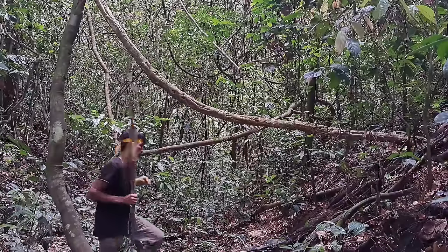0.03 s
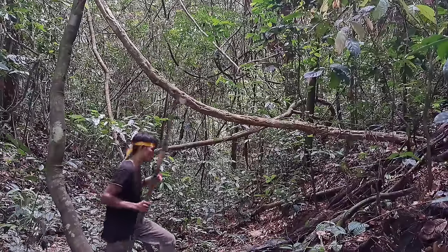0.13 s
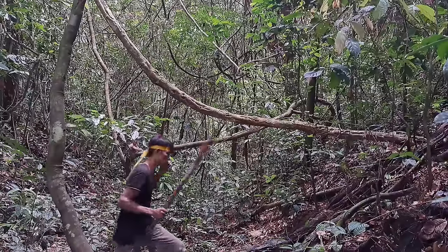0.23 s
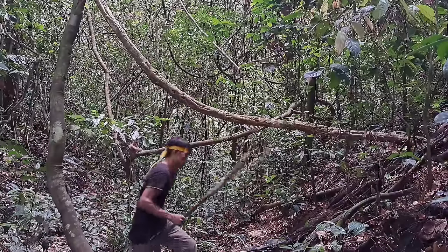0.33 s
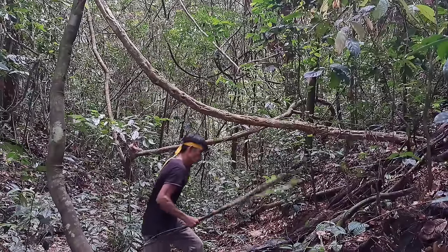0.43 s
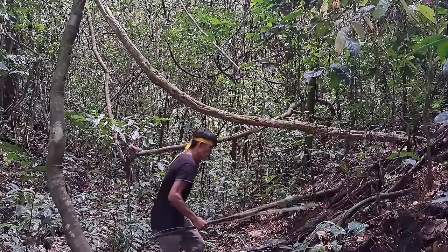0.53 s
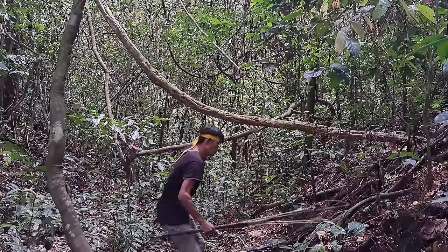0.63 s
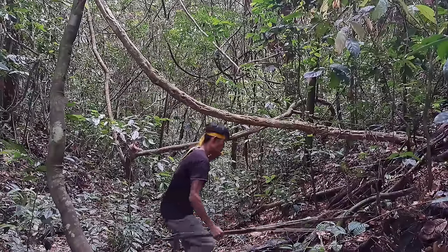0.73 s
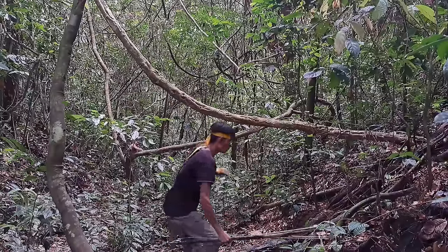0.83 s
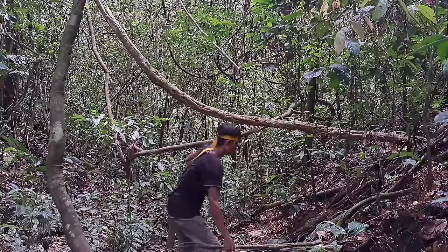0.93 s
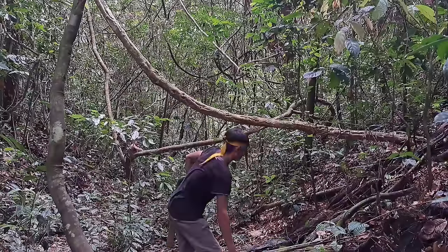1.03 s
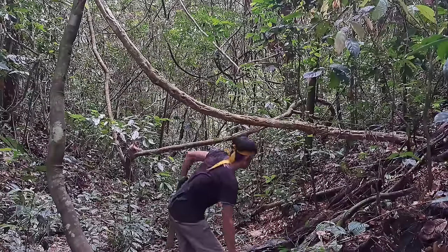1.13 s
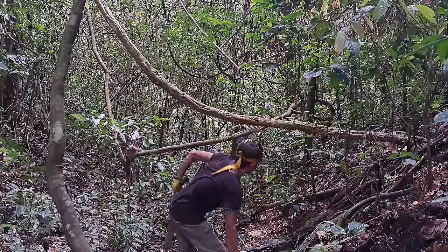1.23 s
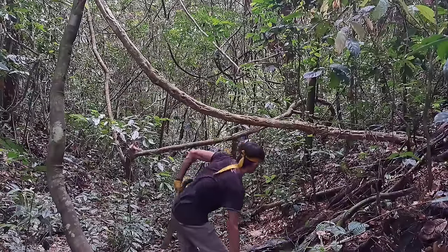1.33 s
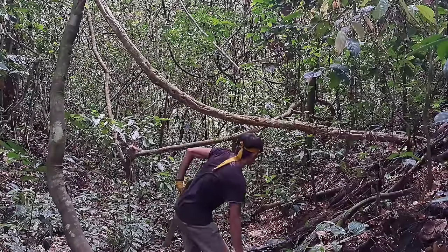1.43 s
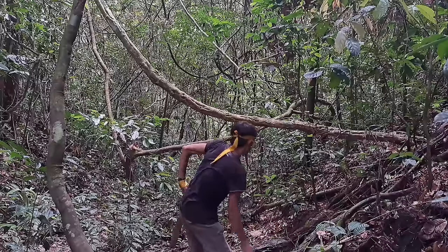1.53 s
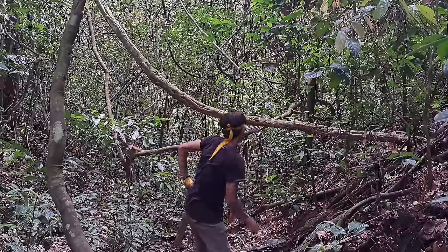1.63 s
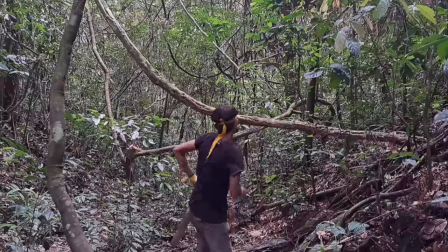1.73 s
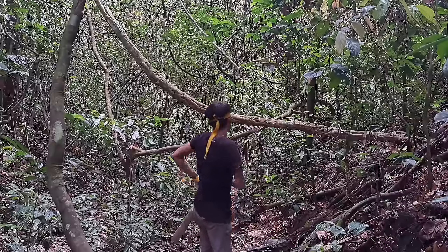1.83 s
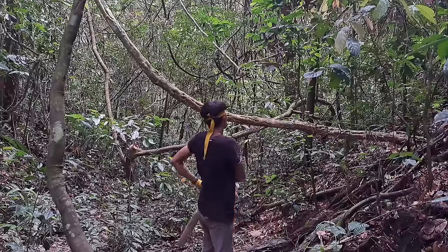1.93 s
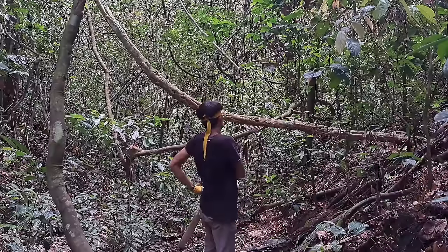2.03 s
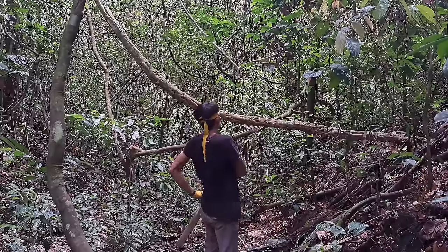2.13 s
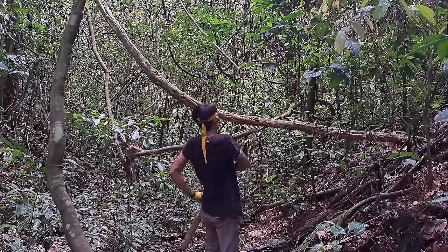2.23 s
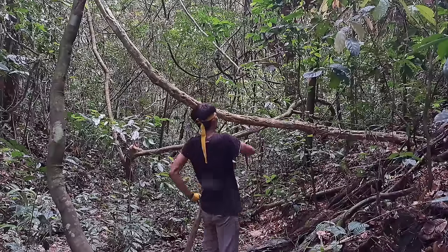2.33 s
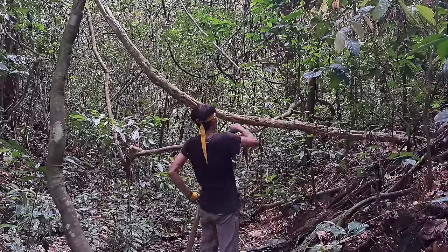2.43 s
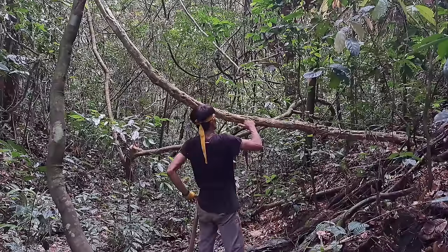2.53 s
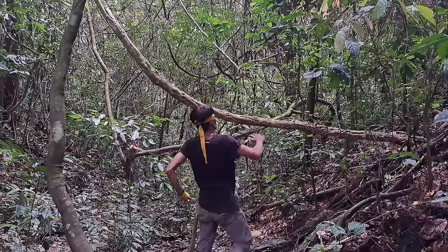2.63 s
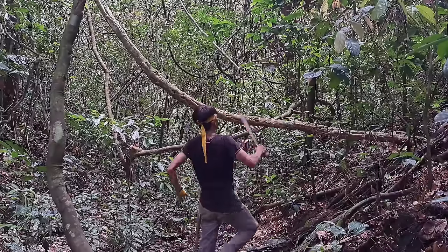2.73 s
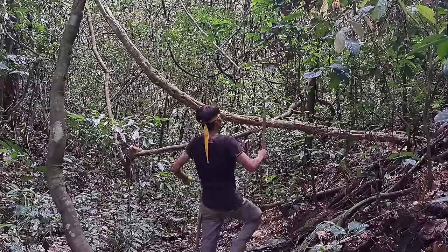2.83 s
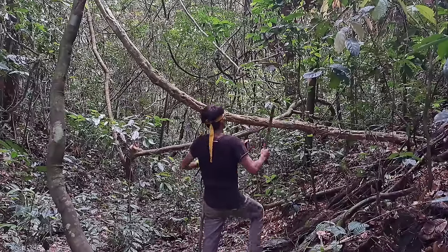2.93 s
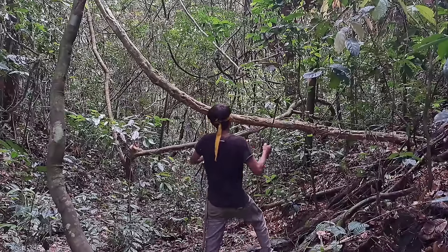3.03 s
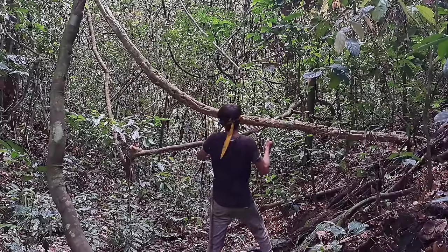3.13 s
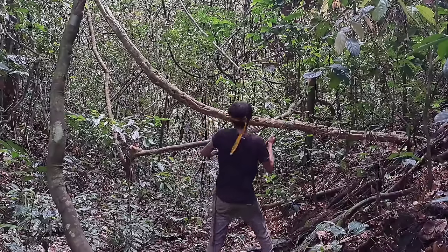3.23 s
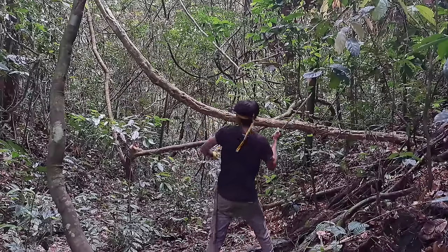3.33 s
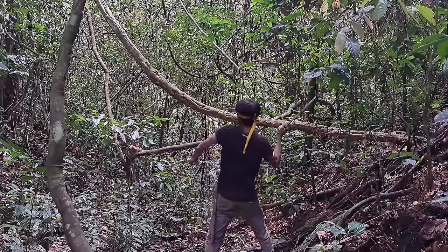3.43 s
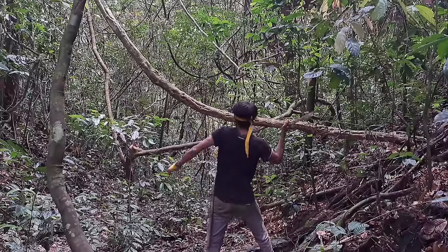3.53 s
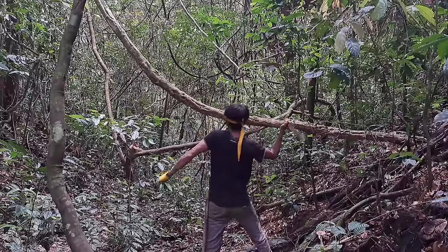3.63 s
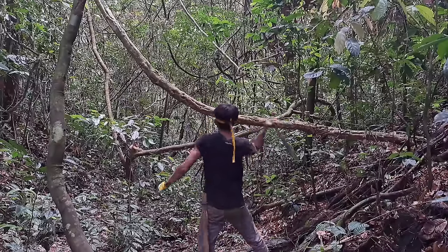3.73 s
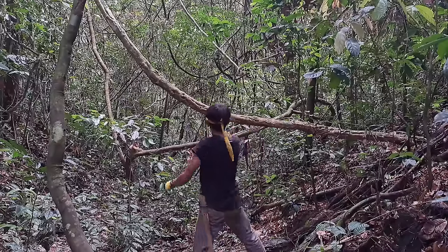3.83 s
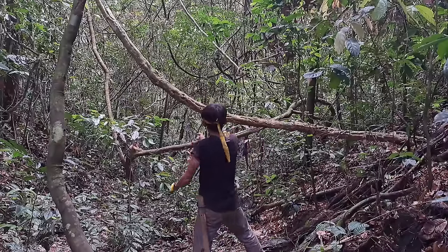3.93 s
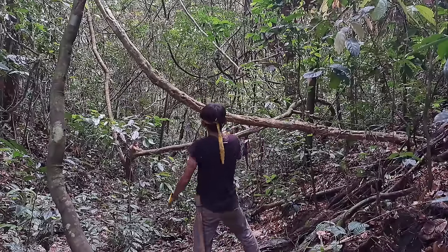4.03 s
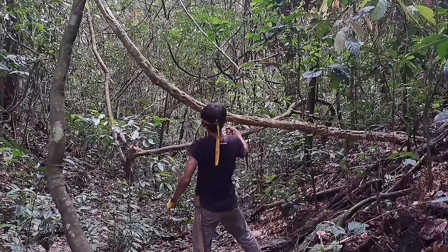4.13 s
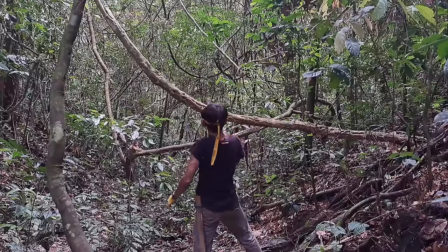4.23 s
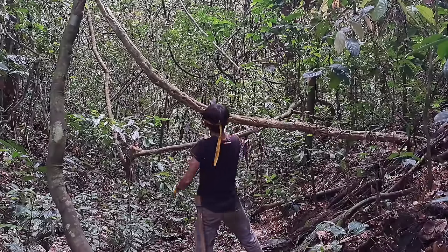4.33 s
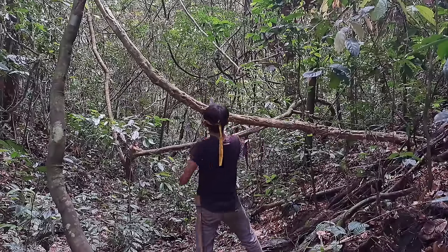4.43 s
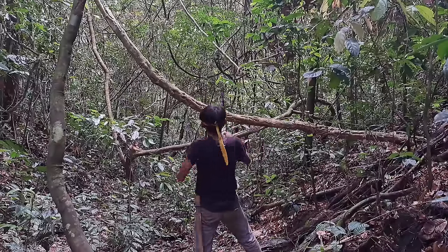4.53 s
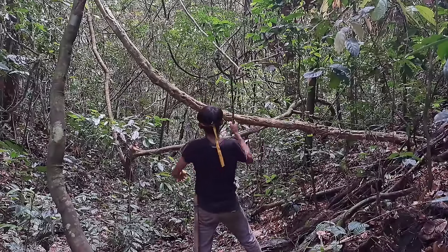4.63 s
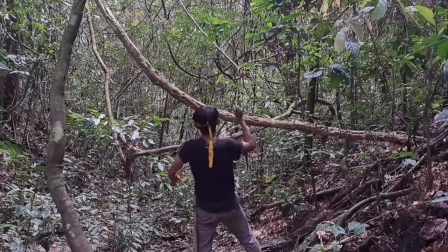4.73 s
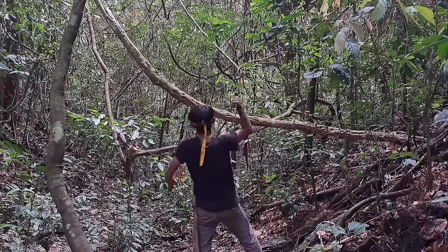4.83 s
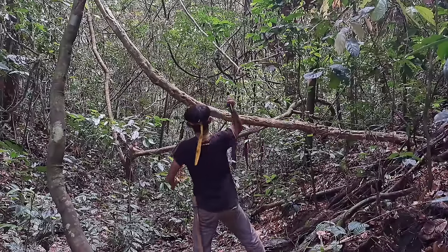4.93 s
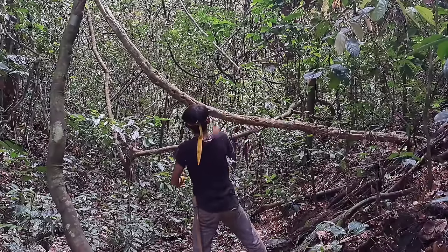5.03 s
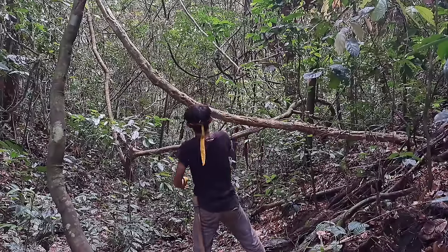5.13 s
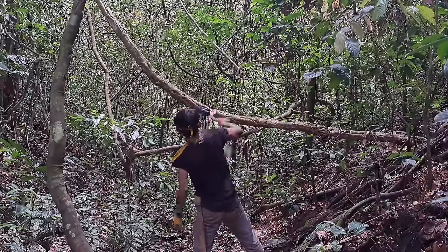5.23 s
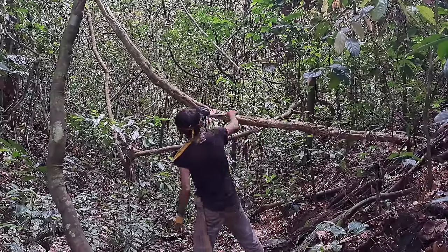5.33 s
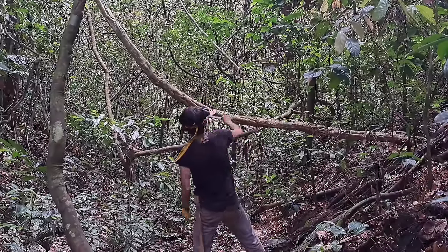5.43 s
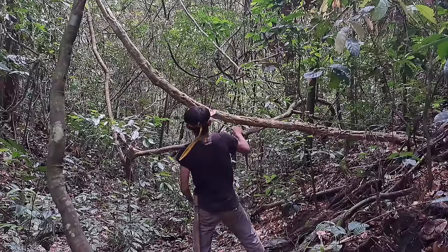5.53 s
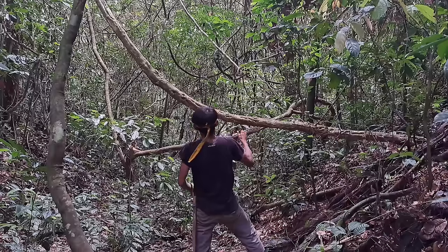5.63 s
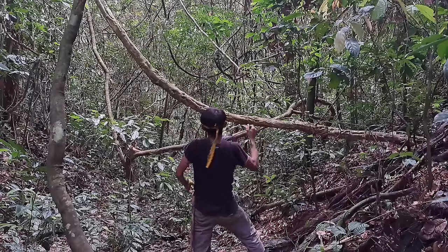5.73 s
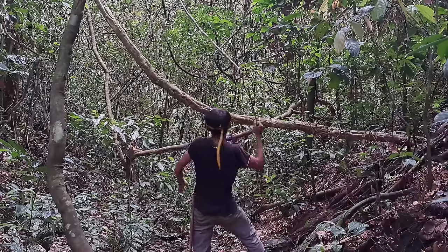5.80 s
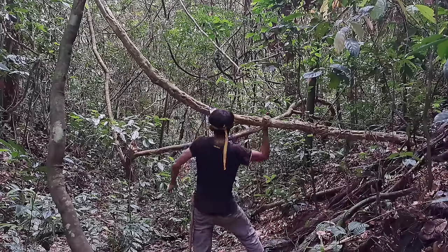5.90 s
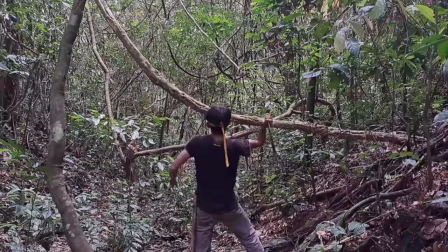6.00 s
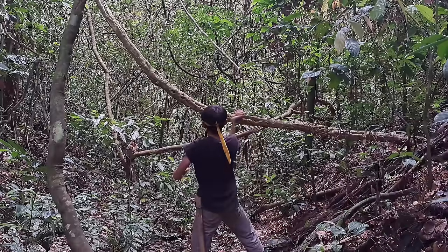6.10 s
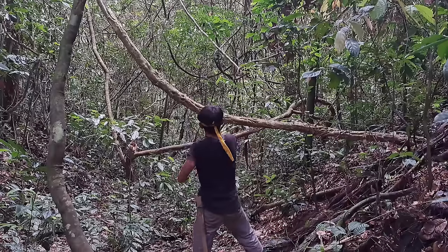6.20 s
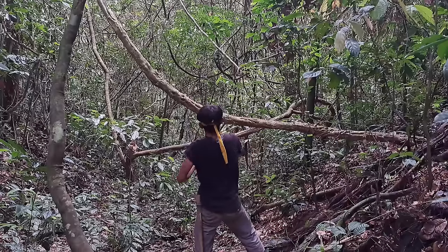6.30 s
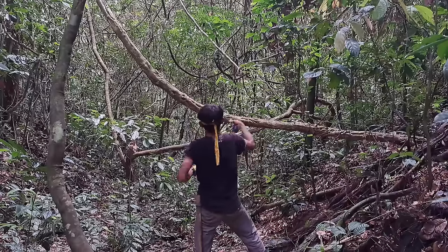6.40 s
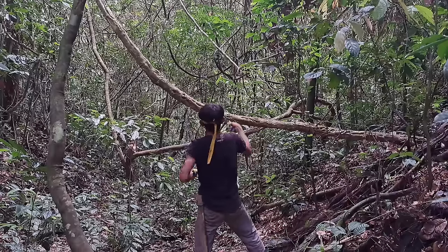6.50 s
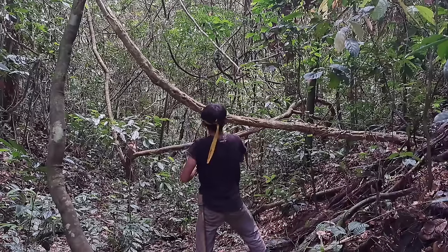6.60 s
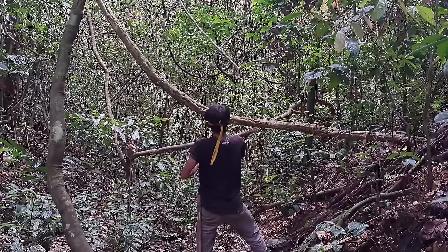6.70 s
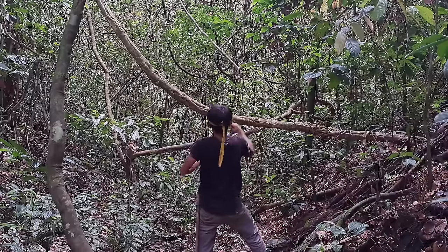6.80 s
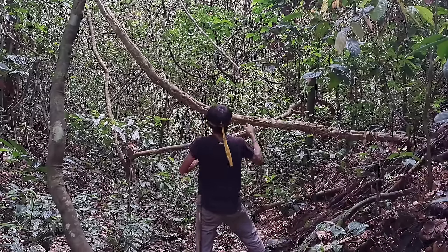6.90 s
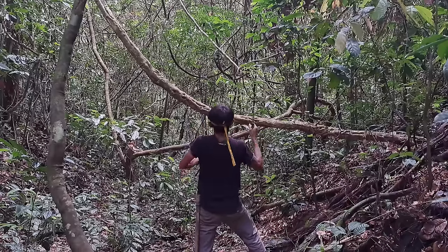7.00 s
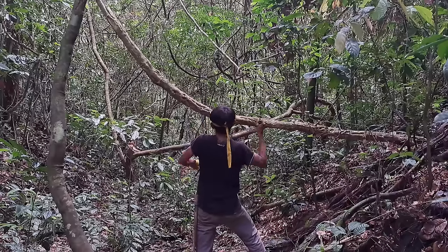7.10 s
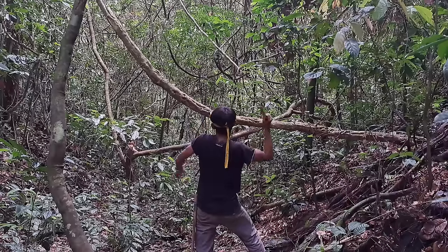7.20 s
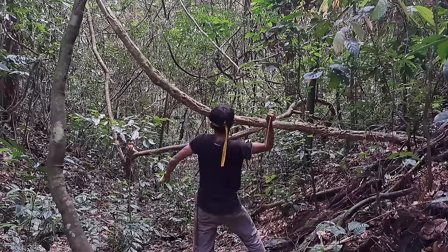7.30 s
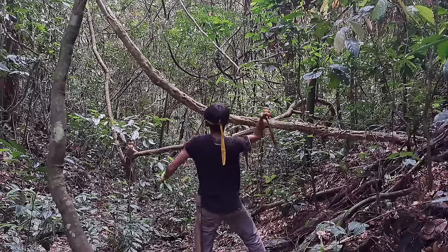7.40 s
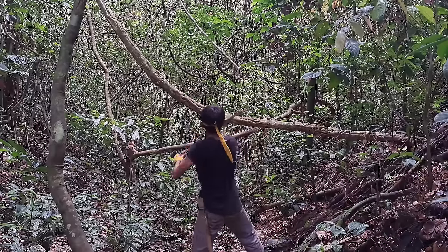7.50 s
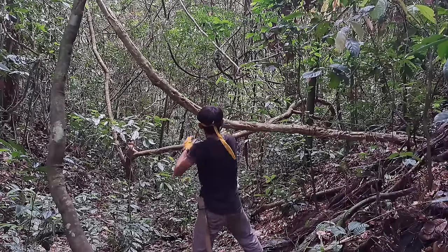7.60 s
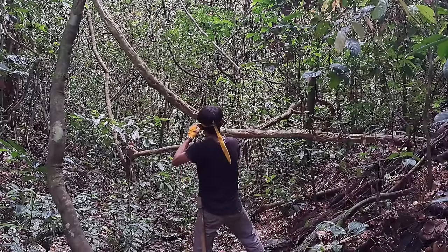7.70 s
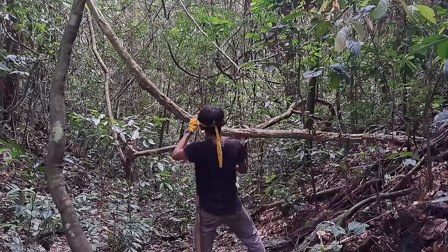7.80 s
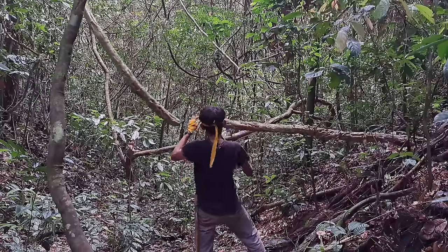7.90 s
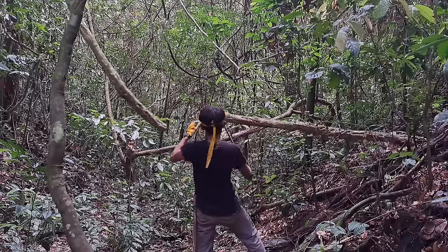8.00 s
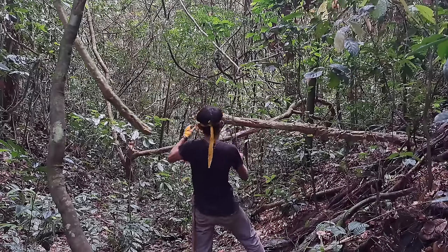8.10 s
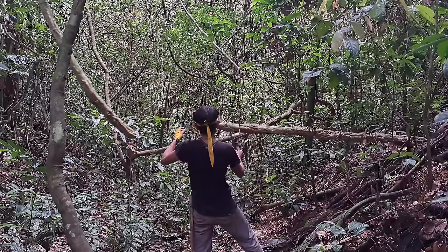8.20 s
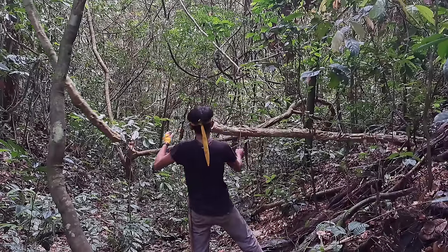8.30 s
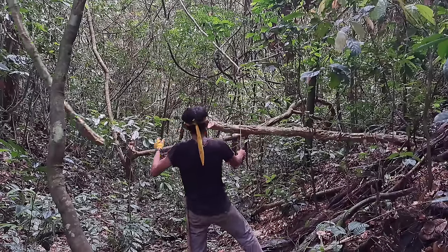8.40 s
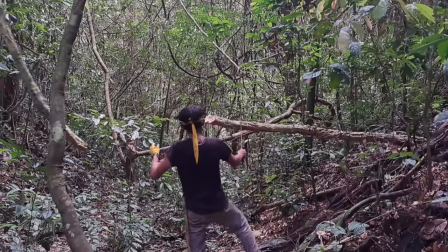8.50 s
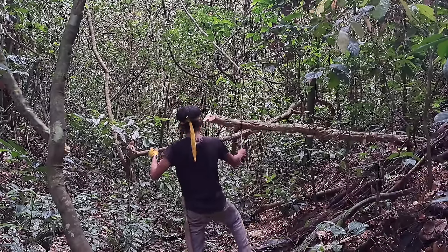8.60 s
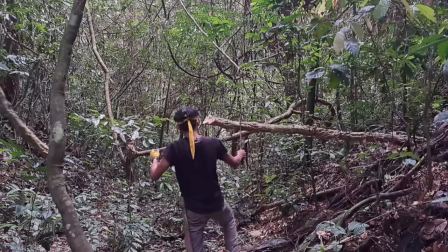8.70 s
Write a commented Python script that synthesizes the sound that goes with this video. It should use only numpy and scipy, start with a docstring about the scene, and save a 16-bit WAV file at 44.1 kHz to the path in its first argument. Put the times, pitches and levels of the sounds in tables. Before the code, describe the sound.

A bright, steady cicada buzz and pulsing cricket tones fill a forest throughout, over very faint air. A distant bird warbles until about 1.3 s; a low soft hoot comes at 1.8 and a tiny peep at 3.9. Soft thuds at 0.3 and 1.0 s, with leaf rustle and twig snaps until 1.7, suggest steps. From 2.25 to 2.55 s a knife scrapes unevenly from a hollow wooden sheath with small knocks, followed by faint shuffles. Heavy chops crack a dry branch at 4.0, 5.15, 6.25 and 7.65 s, slightly right: sharp attack, short low wooden thump, faint blade ring, clearest on the first, and a half-second wash from the trees. The third is fullest. At 5.4 s the blade judders free in a rapid clicking creak. Light snaps fall at 6.15 and 6.7. Around 8.15-8.75 s twigs snap, leaves rustle and a soft thud lands at 8.5.

```python
"""A heavy knife chops a dead branch four times, to the right of the microphones in a forest: noise bursts
crack, decaying sines bend the branch and ring the blade, and fading noise washes back from the trees.
Before that come soft steps in dry leaves (clicks and hiss) and the knife drawn from its wooden sheath
(uneven noise through resonances, with more clicks and hiss). After the second blow the blade judders out.
Cicadas drone in click harmonics and noise, three crickets trill pure tones, and birds call in gliding tones."""
import sys
import numpy as np
from scipy import signal
from scipy.fft import rfft, irfft, next_fast_len
from scipy.io import wavfile
from scipy.ndimage import map_coordinates

SR = 44100
rng = np.random.default_rng(int(sys.argv[2]) if len(sys.argv) > 2 else 0)


def unload_audio(sound):
    """Save the sound as a 16-bit wav file, at the path given as the first command line argument."""
    columns = np.transpose(np.atleast_2d(sound))
    # keep every value between -1 and 1, then stretch to whole-number steps
    steps = np.round(np.clip(columns, -1, 1) * 32767)
    wavfile.write(sys.argv[1], SR, steps.astype(np.int16))


N = 385875

# In every table left_right_db is positive when the left microphone is louder.


def amp(db):
    """Decibels to amplitude."""
    return 10 ** (np.asarray(db) / 20)


def unit(x):
    """Scale x to an rms of 1."""
    return x / np.sqrt(np.mean(x ** 2) + 1e-20)


def along(points, hz):
    """Read a curve of (Hz, value) points on a log frequency axis."""
    f, v = np.transpose(points)
    return np.interp(np.log(hz + 1), np.log(f + 1), v)


def curves(rows, outside=None):
    """One value per sample for each column after the time."""
    s, *cols = np.transpose(rows)
    return [np.interp(np.arange(N) / SR, s, c, outside, outside) for c in cols]


def wobble(rate):
    """A smooth random curve, rate knots a second."""
    knots = rng.standard_normal(int(N * rate / SR) + 4)
    return map_coordinates(knots, [np.arange(N) * rate / SR])


def filtered(x, response):
    """Multiply the spectrum of x by a complex response of frequency."""
    m = next_fast_len(x.shape[-1] + 8192)
    return irfft(rfft(x, m) * response(np.fft.rfftfreq(m, 1 / SR)), m)[..., :x.shape[-1]]


def rush(n, spectrum, alike):
    """Stereo coloured noise of rms 1; the mid and side shares set the left-right likeness."""
    def mid_side(hz):
        turn = np.arccos(np.clip(along(alike, hz), -1, 1)) / 2
        return amp(along(spectrum, hz)) * [np.cos(turn), np.sin(turn)]

    mid, side = filtered(rng.standard_normal((2, n)), mid_side)
    return unit(np.array([mid + side, mid - side]))


def panned(x, db):
    """Place x by a left-right level difference."""
    return x * amp([[db / 2], [-db / 2]])


def add(out, s, x):
    """Mix x into out from time s."""
    i = round(s * SR)
    out[..., i:i + x.shape[-1]] += x[..., :N - i]


# The still forest air: freq_hz, density_db (per Hz)
AIR_SPECTRUM = [(15, -40), (25, -10), (59, -3), (291, -9.5), (354, -10), (429, -10), (478, -11),
                (675, -14.5), (1020, -13.5), (3620, -17), (4300, -13.5), (5590, -42.5), (9460, -120)]
# How alike the air is at the two microphones: freq_hz, likeness (-1 to 1)
AIR_ALIKE = [(60, 0.23), (180, 0.49), (550, 0.26), (1650, -0.19), (4970, 0.02), (15000, 0.072)]
AIR_DB = -69


def air():
    """A faint noise floor of still forest air that breathes a little."""
    return amp(AIR_DB + 1.0 * wobble(3)) * rush(N, AIR_SPECTRUM, AIR_ALIKE)


# The cicada body, which colours the clicks: freq_hz, density_db (per Hz)
CICADA_BODY = [(3710, -27.5), (6300, -21.5), (6420, -21.5), (7450, -17), (7680, -13), (8420, -13.5),
               (9130, -5), (9780, 0), (10800, -3.5), (12600, -14.5), (13700, -16.5), (14900, -12),
               (15700, -14.5)]
# Singers near the microphones: clicks_per_s, level_db, left_right_db
NEAR_CICADAS = [(314.1, 0, 0), (313.4, -3, -4), (315.2, -4, 3)]
# The chorus above 13 kHz: time_s, level_db
HIGH_HISS = [(0, -59), (0.66, -52), (1.32, -57.5), (1.78, -55), (2.75, -55.5), (3.1, -51.5), (3.92, -54),
             (4.73, -59), (5.34, -52), (5.7, -57), (6.63, -51.5), (6.94, -56.5), (8.3, -60), (8.75, -56)]
CICADA_DB = -43.5


def cicadas():
    """Near singers click almost steadily through their bodies; the far chorus blurs to a hiss."""
    near = 0
    for rate, level_db, pan_db in NEAR_CICADAS:
        beats = np.cumsum(rate * (1 + .0012 * wobble(3) + .002 * wobble(60))) / SR
        comb = 0
        for k in range(20, 50):  # harmonics of the click rate
            harmonic = np.cos(2 * np.pi * (k * beats + rng.random((2, 1))))
            comb = comb + harmonic * amp(along(CICADA_BODY, k * rate))
        near = near + amp(level_db + 1.5 * wobble(3.6)) * panned(comb, pan_db)
    far = rush(N, CICADA_BODY, [(8000, -.1)]) * amp(0.97 * wobble(30))
    chorus = .7 * unit(near) + far

    def above(hz, edge_hz):
        return 1 / (1 + (edge_hz / (hz + 1)) ** 8)

    body = unit(filtered(chorus, lambda hz: above(hz, 4800) - above(hz, 13000)))
    high = unit(filtered(chorus, lambda hz: above(hz, 13000)))
    high_db, = curves(HIGH_HISS)
    return panned(amp(CICADA_DB + .4 * wobble(5.9)) * body + amp(high_db) * high, -1.2)


# Three singers with drifting pitch:
# start_pitch_hz, drift_hz_per_s, drift_change_hz_per_s2, chirps_per_s, left_right_db
CRICKETS = [(5710, 45, -2.7, 22.5, -2.5), (5842, 5.5, 0, 11.4, -1), (6082, -5, 2.2, 12.2, -3.5)]
# Their levels: time_s, low_db, middle_db, high_db
CRICKET_LEVELS = [(0, -58, -55, -56), (1, -57, -56.5, -55), (2, -56.5, -52.5, -55.5), (3, -57, -54, -57),
                  (4.4, -58, -54, -57.5), (5.8, -62, -58, -62), (6.9, -59.5, -54.5, -60),
                  (7.6, -60.5, -56.5, -62), (8.75, -57, -54.5, -59)]
# The far choir: freq_hz, density_db (per Hz)
FAR_CRICKETS = [(4200, -39.5), (4600, -3), (4800, -2.5), (5200, -39.5)]


def crickets():
    """Pure wing tones, pulsed eleven to twenty-two times a second; a far choir is a faint band."""
    t = np.arange(N) / SR
    out = amp(-77 + 2.5 * wobble(4)) * rush(N, FAR_CRICKETS, [(4700, 0.12)])
    for (hz, drift, bend, rate, pan_db), db in zip(CRICKETS, curves(CRICKET_LEVELS)):
        pulse_cycles = np.cumsum(rate * (1 + .05 * wobble(2))) / SR
        chirp = (1 + 0.33 * np.sin(2 * np.pi * pulse_cycles)) ** 1.2
        pitch_hz = hz + drift * t + bend * t ** 2 / 2 + 4 * wobble(1.2) + 10 * wobble(60)
        tone = np.sin(2 * np.pi * (np.cumsum(pitch_hz) / SR + rng.random((2, 1))))
        out = out + amp(db + 1.6 * wobble(40) + 2.2 * wobble(130)) * unit(chirp * panned(tone, pan_db))
    return out


# A dove's hoot, then a near peep: start_s, length_s, pitch_hz, glide_hz_per_s, level_db, left_right_db
BIRD_NOTES = [(1.81, .19, 545, -110, -65, 0), (3.895, .05, 3085, -300, -61, -4)]
# The far whistler; its period is one rise and fall, its top the first high point
WARBLE_HZ, WARBLE_SWING_HZ, WARBLE_PERIOD_S, WARBLE_TOP_S = 2960, 160, .36, .07
WARBLE_DB, WARBLE_END_S, WARBLE_FADE_DB_PER_S = -72, 1.28, 170


def birds():
    """Clean gliding notes that swell and fade; a far whistler's warble arrives smeared by echoes."""
    out, t = np.zeros((2, N)), np.arange(N) / SR
    for s, length, hz, glide, level_db, pan_db in BIRD_NOTES:
        u = t[:round(length * SR)]
        swell = np.sin(np.pi * u / length) ** 2
        note = np.sqrt(2) * amp(level_db) * swell * np.sin(2 * np.pi * (hz + glide * u / 2) * u)
        add(out, s, panned(note, pan_db))
    # tanh makes the warble dwell on a high and a low note
    turn = np.tanh(2.5 * np.cos(2 * np.pi * (t - WARBLE_TOP_S) / WARBLE_PERIOD_S))
    hz = WARBLE_HZ + 80 * wobble(14) + WARBLE_SWING_HZ * turn
    whistle = np.exp(2j * np.pi * np.cumsum(hz) / SR)
    smear = np.array([wobble(550) + 1j * wobble(550), wobble(550) + 1j * wobble(550)])
    db = WARBLE_DB - WARBLE_FADE_DB_PER_S * np.maximum(t - WARBLE_END_S, 0)
    return out + amp(db + 2.5 * wobble(25) + 3 * wobble(12)) * (smear * whistle).real


# How long the trees hold a sound: freq_hz, t60_s
TREES = [(300, 0.36), (1000, 0.47), (2500, 0.68), (6000, 0.53), (12000, 0.44)]


def dying(x):
    """Each frequency fades at the speed that the trees allow."""
    hz, t, z = signal.stft(x, SR, nperseg=256)
    fade = amp(-60 * t / along(TREES, hz)[:, None])
    return signal.istft(z * fade, SR, nperseg=256)[1][..., :x.shape[-1]]


# Twigs and chips: start_s, peak_db, pitch_hz, left_right_db
SNAPS = [(0.08, -53, 3080, -4), (1.03, -41, 4330, -7), (1.221, -49.5, 3170, -7), (1.514, -45, 5200, -7),
         (1.662, -51, 4190, -7), (6.153, -48.5, 3030, 1.5), (6.695, -43, 1500, -4.5),
         (8.158, -48, 4010, -7), (8.31, -53, 4400, -7), (8.478, -37, 3400, -7), (8.515, -40, 594, -7),
         (8.722, -45, 822, -3.5)]
# How alike any wash from the trees is at the two microphones: freq_hz, likeness (-1 to 1)
WASH_ALIKE = [(60, 1), (240, 0.89), (950, -0.033), (3770, -0.26), (15000, -0.25)]
SNAP_T60_S = .06


def snaps():
    """Twigs and chips: short dry cracks around their own pitch, each with a faint wash."""
    out, t = np.zeros((2, N)), np.arange(SR // 2) / SR
    for s, peak_db, hz, pan_db in SNAPS:
        colour = [(hz / 30, -50), (hz / 5, -14), (hz, 0), (hz * 1.1, -4), (hz * 1.6, -3), (hz * 3, -22)]
        burst = amp(-60 * t / SNAP_T60_S) * (1 - np.exp(-t / .0007))
        crack = burst * rush(len(t), colour, [(300, 0.98), (5000, 0.62)])
        wash = amp(-19.5) * dying(rush(len(t), colour, WASH_ALIKE))
        add(out, s, amp(peak_db - 7.5) * panned(crack + wash, pan_db))  # from peak to rms
    return out


# Soft contacts with ground and wood: start_s, level_db, pitch_hz, t60_s, soil_boom_db
THUDS = [(.326, -47.5, 280, .22, -52), (1.045, -51, 295, .27, -56), (2.72, -58, 246, .1, -75),
         (3.185, -54.5, 403, .1, -57), (3.75, -60, 250, .1, -75), (5.084, -49.5, 130, .13, -70),
         (5.119, -52.5, 199, .09, -70), (7.935, -49, 141, .15, -70), (8.481, -39, 212, .24, -47),
         (8.72, -56, 300, .09, -70)]
BOOM_HZ, BOOM_T60_S, BOOM_LATE_S = 70, .22, .012


def thuds():
    """A soft push: round low noise that swells in a few ms and dies; the soil booms just after."""
    out, t = np.zeros((2, N)), np.arange(SR // 2) / SR
    for s, db, hz, t60, boom_db in THUDS:
        push = (s, db, hz, t60)
        boom = (s + BOOM_LATE_S, boom_db, BOOM_HZ, BOOM_T60_S)
        for at, level_db, f, life in (push, boom):
            colour = [(f / 8, -40), (f / 2, -7), (f, 0), (f * 2.2, -9), (f * 8, -45)]
            low = rush(len(t), colour, [(100, 0.8)])
            add(out, at, amp(level_db - 60 * t / life) * (1 - np.exp(-t / 0.0045)) * low)
    return out


# Colour of every brush: freq_hz, density_db (per Hz)
BRUSH_COLOUR = [(80, -64.5), (300, -14.5), (1000, -11.5), (3000, -7.5), (6000, -6), (12000, -13),
                (15700, -22.5)]
# Brushes through dry leaves; the two near 2.4 s are the hiss of the knife scraping out of its sheath:
# loudest_s, level_db, swell_s (by 20 dB), fade_s (by 20 dB)
BRUSHES = [(1.055, -49.5, .06, .18), (1.216, -61, .04, .8), (1.52, -57, .04, .3), (2.33, -55, .07, .4),
           (2.465, -49.5, .15, .075), (3.174, -62, .05, .17), (3.642, -65, .08, .4), (5.01, -63, .15, .5),
           (6.15, -66, .03, .15), (8.162, -56, .03, .1), (8.49, -55, .02, .5), (8.75, -52.5, .1, .1)]


def brushes():
    """Dry leaves, and the knife's scraping hiss: dense uneven clicks over noise that swell and fade."""
    t = np.arange(N) / SR
    hits = rng.random((2, N)) < 900 / SR  # 900 clicks a second on each side
    clicks = hits * rng.standard_normal((2, N)) * amp(2 * rng.exponential(size=N))
    grains = unit(filtered(clicks, lambda hz: amp(along(BRUSH_COLOUR, hz))))
    hiss = rush(N, BRUSH_COLOUR, [(300, .9), (4000, 0.4)])
    level = sum(amp(db + 20 * np.minimum((t - s) / swell, (s - t) / fade)) for s, db, swell, fade in BRUSHES)
    return level * amp(2.5 * wobble(30)) * unit(1.1 * grains + hiss)


# The knife leaving the sheath: time_s, level_db
DRAW = [(2.23, -95), (2.25, -59.5), (2.32, -41), (2.335, -51), (2.368, -51), (2.45, -38), (2.478, -51),
        (2.594, -82)]
# Resonances of the sheath with the blade in, then out: pitch_hz, width_hz, level_db
SHEATH_FULL = [(840, 48, -4.5), (1183, 110, 3), (1700, 21, -15.5), (2400, 40, -12)]
SHEATH_EMPTY = [(300, 26, -27), (693, 27, -8.5), (935, 39, -7.5), (1387, 81, -18.5), (1810, 97, -21.5)]
# The blade starts to slide, then is nearly out: time_s, time_s
BLADE_OUT_S = (2.26, 2.47)


def sheath():
    """The blade scrapes in uneven slips; the hollow sounds lower as it empties."""
    slips = rng.standard_normal(N) * amp(2.7 * wobble(180))

    def hollow(modes):
        def response(f):
            total = 0
            for k, (c, w, g) in enumerate(modes):  # resonances of alternating sign
                total = total + (-1) ** k * amp(g) * 1j * f * w / (c * c - f * f + 1j * f * w)
            return total
        return unit(filtered(slips, response))

    share = np.interp(np.arange(N) / SR, BLADE_OUT_S, [0, .9])
    db, = curves(DRAW, outside=-140)
    return amp(db) * (np.sqrt(1 - share) * hollow(SHEATH_FULL) + np.sqrt(share) * hollow(SHEATH_EMPTY))


# The blade catches on the sheath: start_s, level_db
CATCHES = [(2.306, -41), (2.317, -38), (2.4165, -33), (2.438, -37), (2.449, -34), (2.498, -46)]


def catches():
    """Small hollow knocks on the two strongest notes of the empty sheath."""
    out, t = np.zeros(N), np.arange(SR // 10) / SR
    for s, level_db in CATCHES:
        notes = sum(np.sin(2 * np.pi * hz * (1 + .05 * rng.normal()) * t) for hz, *_ in SHEATH_EMPTY[1:3])
        add(out, s, amp(level_db - 60 * t / .03) * (1 - np.exp(-t / .0015)) ** 2 * notes)
    return out


# The blows: crack_s, bite_s (before the crack), crack_db, wash_db, brightness_db_per_octave, blade_db,
# thud_db, thud_slope_db_per_octave, branch_pitch_ratio, favoured_hz (by the place of the blow),
# choke_s (until the supports choke the swing by 20 dB)
CHOPS = [(3.966, .003, -14, -28, 0, -37, -34, -4.5, 0.98, 128, .29),
         (5.1576, 0.0014, -10, -26, .8, -51, -26.5, 0, 1.1, 155, .27),
         (6.258, 0.00057, -7, -20.5, -.6, -46.5, -24, .8, .98, 240, .24),
         (7.6388, 0.0018, -14, -25.5, -.5, -49.5, -25, 1.5, .98, 270, .2)]
# Splitting fibres: freq_hz, density_db (per Hz)
CRACK = [(180, -30), (300, -1.5), (1110, -16), (2300, -4), (2900, -15.5), (4530, -9.5), (6310, -16),
         (7830, -8.5), (8940, -21.5), (15700, -22.5)]
# The crack scattered by trunks: freq_hz, density_db (per Hz)
WASH = [(150, -29), (250, -2), (841, -11), (1270, -8.5), (1680, -6), (2640, -4.5), (6490, -10.5),
        (9670, -8), (14900, -9.5), (15700, -20)]
# The bending branch, before the pitch ratio of each blow: pitch_hz, level_db, t60_s
BENDING = [(56, -2, 0.55), (92, -2, .34), (133, -1, 0.34), (175, 0, .26), (240, -1.5, 0.16),
           (355, -4, 0.13), (480, -10, .1)]
# The ringing blade: pitch_hz, level_db, t60_s
BLADE = [(1430, -2, .4), (1520, 0, .5), (1960, -10.5, 0.3), (2330, -7.5, .3)]
FAVOUR_DB, FAVOUR_OCTAVES = 7, .3  # lift and width of the favoured note


def chops():
    """Each blow bites in, cracks, bends the branch, rings the blade and washes through the trees."""
    out, t = np.zeros((2, N)), np.arange(SR) / SR
    for (s, bite, crack_db, wash_db, tilt, blade_db, thud_db, slope, ratio,
         favoured_hz, choke) in CHOPS:
        late = np.maximum(t - bite, 0)
        burst = np.where(t < bite, .25, amp(-60 * late / 0.0053) + 0.34 * amp(-60 * late / 0.079))
        crack = amp(crack_db) * burst * rush(SR, CRACK, [(300, 1.0), (3000, .85), (12000, 0.37)])
        wash = amp(wash_db) * (1 - np.exp(-t / 0.0022)) * dying(rush(SR, WASH, WASH_ALIKE))
        wash = wash * amp(.9 * wobble(45)[:SR] + 1.6 * wobble(220)[:SR])  # single trunks answer unevenly
        bright = filtered(crack + wash, lambda hz: amp(tilt * np.log2((hz + 100) / 2500)))

        wood = 0
        sag = t + .003 * (1 - np.exp(-t / 0.018))  # the pitch drops as the swing settles
        choke_db = 20 * np.minimum(t / choke, 2) ** 4
        for hz, g, t60 in BENDING:
            rise_s = 0.13 / np.sqrt(hz)  # low bending waves travel slowly and build up late
            shake = amp(3.1 * wobble(35)[:SR])  # twigs and supports rattle the swing
            pitch_hz = hz * ratio * (1 + .02 * rng.normal())
            swing = np.sin(2 * np.pi * (pitch_hz * sag + .13 * wobble(30)[:SR]))
            lift_db = FAVOUR_DB * np.exp(-(np.log2(hz / favoured_hz) / FAVOUR_OCTAVES) ** 2)
            start_db = thud_db + g + lift_db + slope * np.log2(hz / 150)
            level = amp(start_db - 60 * t / t60 - choke_db)
            wood = wood + level * (1 - np.exp(-(t / rise_s) ** 2)) * shake * swing

        steel = 0
        for hz, g, t60 in BLADE:
            level = amp(blade_db + g - 60 * t / t60 + 3 * wobble(50)[:SR])
            steel = steel + level * np.sin(2 * np.pi * (hz * t + .22 * wobble(70)[:SR]))
        add(out, s - bite, bright + wood + steel)
    return out


# The blade judders out of the cut: start_s, slips, gap_s, first_slip_db, fade_db_per_slip
WRENCH = (5.3846, 9, .0033, -20.5, 1.7)
# Its clicks: freq_hz, density_db (per Hz)
SPLINTERS = [(120, -53), (200, -25), (361, -16), (610, -18), (1560, -9.5), (2220, 0.5), (2560, -12.5),
             (4760, -13), (5410, -19), (9000, -24.5), (11700, -54), (19800, -120)]
# The split wood rings: pitch_hz, t60_s
SPLIT = (2150, .014)


def wrench():
    """Stick and slip: a quick run of clicks, each ringing the split wood, with a faint wash."""
    s, slips, gap, first_db, fade_db = WRENCH
    split_hz, split_t60 = SPLIT
    out, t = np.zeros((2, N)), np.arange(SR // 2) / SR
    ring_level = 1.8 * amp(-60 * t / split_t60) * (1 - np.exp(-t / .0004))
    ring = ring_level * np.sin(2 * np.pi * split_hz * t)
    for k in range(round(slips)):
        click = amp(-60 * t / .013) * rush(len(t), SPLINTERS, [(300, .97), (5000, .8)])
        at = s + gap * (k + .12 * rng.normal() * (k > 0))  # uneven gaps after the first slip
        slip_db = first_db - 7 - fade_db * k + rng.normal(0, 1.2)
        add(out, at, amp(slip_db) * (click + ring))
    wash = dying(rush(len(t), SPLINTERS, WASH_ALIKE))
    add(out, s + .01, amp(first_db - 30 - 130 * t) * wash)
    return out


# The cutter stands to the right of the microphones: freq_hz, left_right_db
RIGHTWARD = [(40, -2.8), (100, -2.2), (350, -1.8), (1400, -4.3), (5000, -7), (9000, -1.5), (14000, -1)]


def scene():
    """The cutter's sounds, turned to the right, among the birds, insects and air."""
    cutter = chops() + wrench() + snaps() + thuds() + brushes() + sheath() + catches()
    cutter = filtered(cutter, lambda hz: amp(along(RIGHTWARD, hz) * [[.5], [-.5]]))
    return cutter + birds() + cicadas() + crickets() + air()


TOP_HZ = 15760


def record(dry):
    """The recorder rounds off peaks near the top of its range and keeps nothing above its band limit."""
    rounded = dry / (1 + np.abs(dry / .97) ** 6) ** (1 / 6)
    return filtered(rounded, lambda hz: hz < TOP_HZ)


dry = scene()
out = record(dry)
unload_audio(out)
```